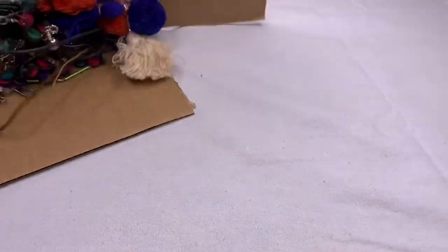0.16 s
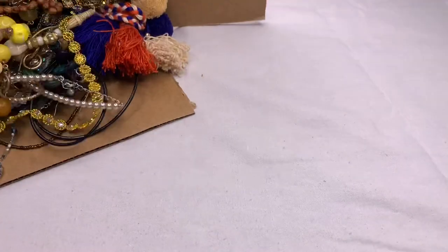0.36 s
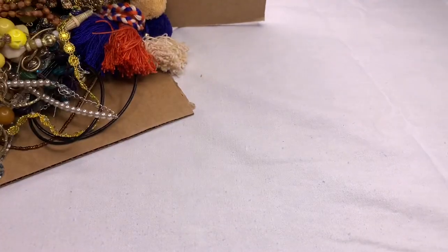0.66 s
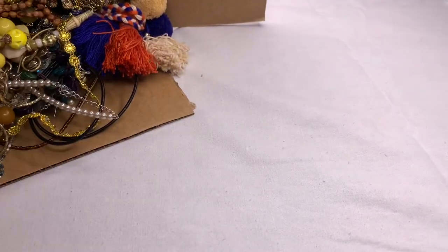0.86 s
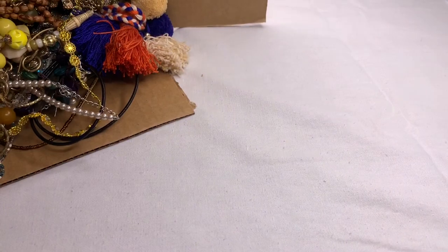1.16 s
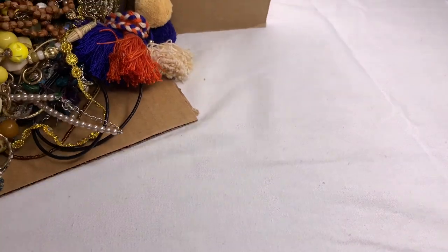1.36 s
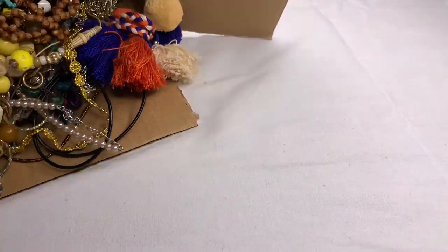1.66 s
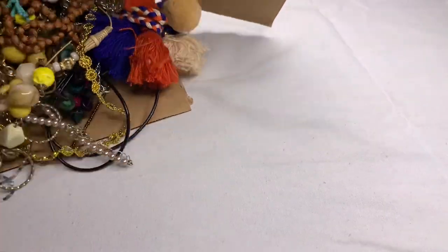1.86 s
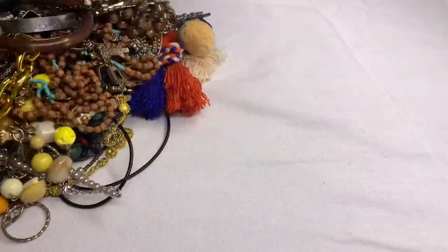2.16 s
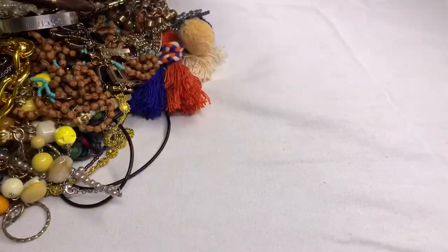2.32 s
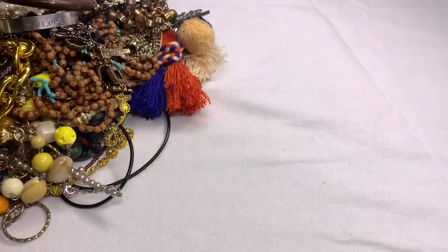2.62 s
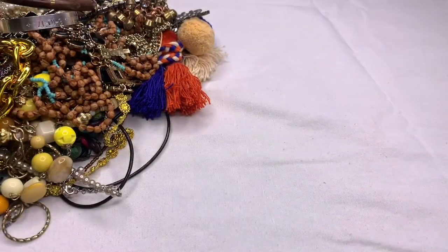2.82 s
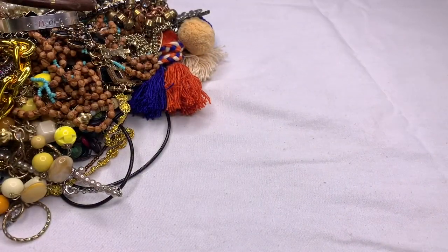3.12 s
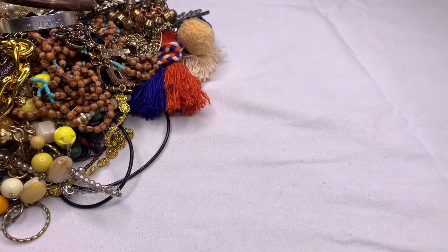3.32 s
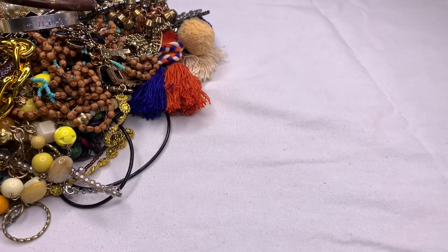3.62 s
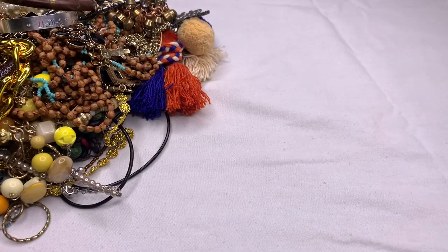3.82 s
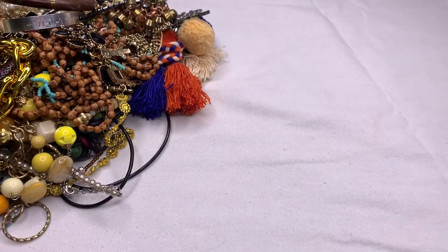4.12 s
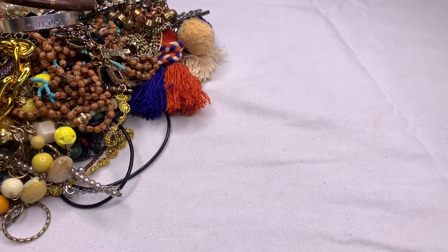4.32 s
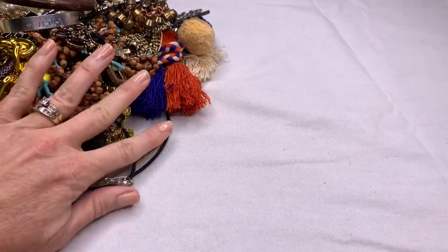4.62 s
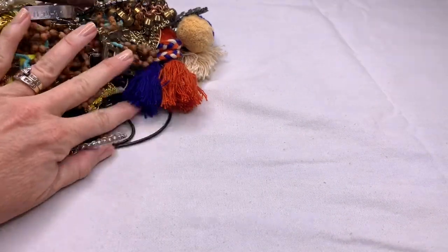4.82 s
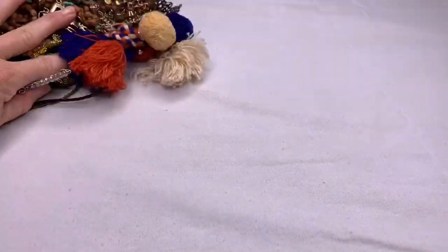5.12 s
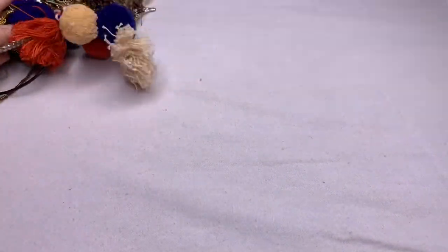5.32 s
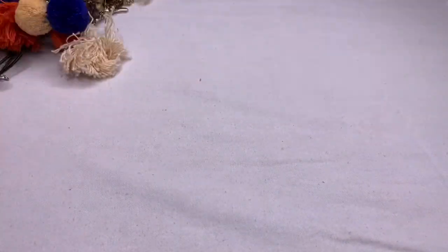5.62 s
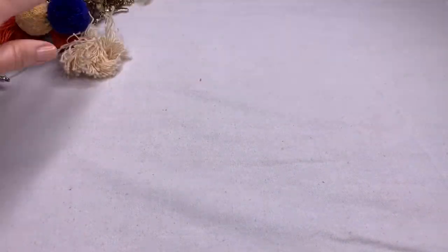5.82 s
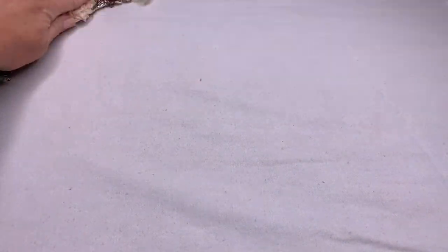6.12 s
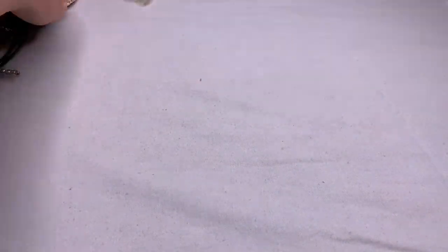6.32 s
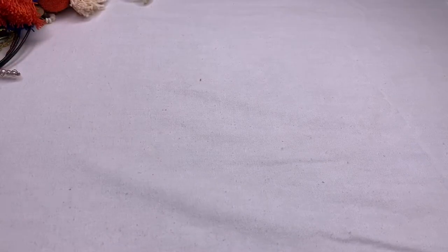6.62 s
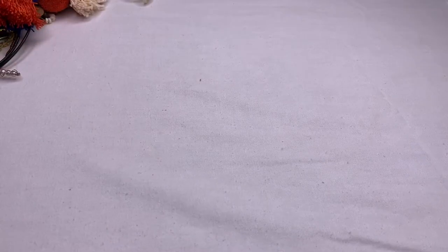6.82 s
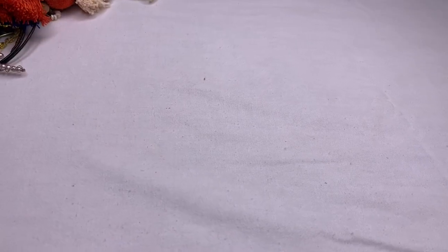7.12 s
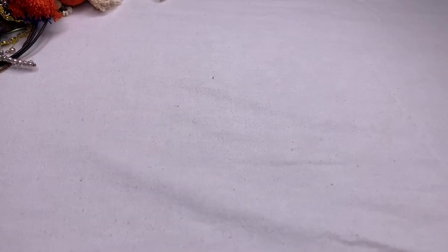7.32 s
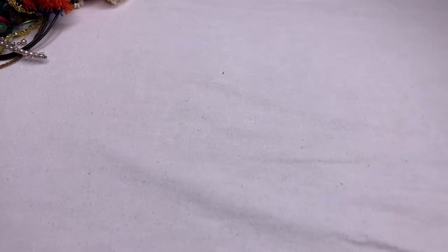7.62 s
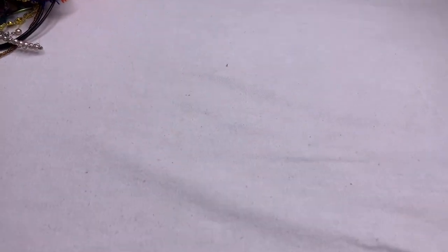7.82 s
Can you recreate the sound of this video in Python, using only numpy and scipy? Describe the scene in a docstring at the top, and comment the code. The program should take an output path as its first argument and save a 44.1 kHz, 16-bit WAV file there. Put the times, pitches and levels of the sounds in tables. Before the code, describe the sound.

A tangle of beads and chains slides rattling out of a cardboard box onto a cloth-covered table, the empty box thuds down, then soft sweeps and creaks.

```python
"""In a small dry room with a faint hum, a cardboard box of chains and beads is tipped out on a cloth-covered
table, left of a two-port microphone. Noise grains and damped sines make the beads rattle and thump the card;
the empty box is dropped as a set of ringing modes under a slap; a hand sweeps the pile over the cloth twice
as shaped noise; and something close by creaks in short runs of ticks that ring a low body."""
import sys
import numpy as np
from scipy import signal
from scipy.fft import rfft, irfft, next_fast_len
from scipy.io import wavfile
from scipy.ndimage import uniform_filter1d

SR = 44100
rng = np.random.default_rng(int(sys.argv[2]) if len(sys.argv) > 2 else 0)


def store_wav(level_fs):
    """Save 16-bit WAV to argv[1]."""
    pcm = np.round(np.clip(np.atleast_2d(level_fs), -1, 1) * 32767)
    wavfile.write(sys.argv[1], SR, pcm.T.astype(np.int16))


N = 351477

# resonances of the cardboard panel: f/Hz, width/Hz, level/dB
CARD_MODES = [(187, 210, 7), (508, 250, 8.5), (736, 109, 13.5), (1040, 130, 3), (1860, 240, -10)]
# resonances of the table top: f/Hz, width/Hz, level/dB
TABLE_MODES = [(105.3, 80, -12.5), (237, 43, 5), (467, 83, 0), (660, 100, -2.5), (747.5, 210, -9),
               (1092, 130, -14.5)]


def amp(db):
    """Amplitude ratio of a level in dB."""
    return 10 ** (np.asarray(db) / 20)


def unit(x):
    """x scaled to rms 1."""
    return x / np.sqrt(np.mean(x ** 2) + 1e-20)


def along(points, hz):
    """Read (f/Hz, value) points at any frequency, straight lines on a log axis."""
    f, value = np.transpose(points)
    return np.interp(np.log(hz + 1), np.log(f + 1), value)


def gains(rows):
    """Fade lines: one gain per sample for each dB column, silent outside the rows."""
    times, *columns = np.transpose(rows)
    t = np.arange(N) / SR
    return [amp(np.interp(t, times, column, -150, -150)) for column in columns]


def filtered(x, response):
    """Shape the spectrum of x by a complex response of frequency."""
    m = next_fast_len(N + SR // 2)
    return irfft(rfft(x, m) * response(np.fft.rfftfreq(m, 1 / SR)), m)[..., :N]


def coloured(x, spectrum):
    """Equalise x by (f/Hz, level/dB) points."""
    return filtered(x, lambda hz: amp(along(spectrum, hz)))


def through(x, modes):
    """x excites a body: parallel (f/Hz, width/Hz, level/dB) resonances of alternating sign."""
    def body(f):
        total = 0
        for k, (centre, width, db) in enumerate(modes):
            resonance = 1j * f * width / (centre * centre - f * f + 1j * f * width)
            total = total + (-1) ** k * amp(db) * resonance
        return total
    return filtered(x, body)


def contacts(per_s, spread_db, smooth, t60):
    """Random contacts of unequal size, each a dying puff of noise, over a share of smooth noise."""
    happens = rng.random(N) < per_s / SR
    sizes = happens * amp(spread_db * np.clip(rng.standard_normal(N), -2, 2))
    swell = signal.lfilter([1], [1, -amp(-60 / (t60 * SR))], sizes)
    share = np.clip(smooth, 0, 1)
    return (np.sqrt(1 - share) * unit(swell) + np.sqrt(share)) * rng.standard_normal(N)


def bursts(times, levels_db, t60, rise=0.0004):
    """A short dying puff of noise at each time, its level set by its energy."""
    out, t = np.zeros(N + SR), np.arange(SR // 10) / SR
    shape = amp(-60 * t / t60) * (1 - np.exp(-t / rise))
    for s, db in zip(times, levels_db):
        puff = shape * rng.standard_normal(len(t))
        out[round(s * SR):][:len(t)] += amp(db) * puff / np.linalg.norm(puff)
    return out[:N]


def rings(times, levels_db, pitches_hz, t60s, rise):
    """A damped sine at each time, with a softened attack."""
    out, t = np.zeros(N + SR), np.arange(SR // 8) / SR
    for s, db, hz, t60 in zip(times, levels_db, pitches_hz, t60s):
        shape = amp(db - 60 * t / max(t60, .004)) * (1 - np.exp(-t / rise))
        out[round(s * SR):][:len(t)] += shape * np.sin(2 * np.pi * hz * t)
    return out[:N]


def clacks(per_s, centre_hz, spread, turns, spread_db):
    """Hard beads meeting: each a few turns of a damped sine at its own pitch; rms 1."""
    count, t = 25 * 343, np.arange(400) / SR  # candidates, of which a share sounds
    when, pick = rng.random((count, 2)).T
    pitch, size = rng.standard_normal((count, 2)).T
    hz = np.clip(centre_hz * np.exp(spread * pitch), 600, 15000)[:, None]
    sounds = pick < per_s * N / SR / count
    size = sounds * amp(spread_db * np.clip(size, -2, 2))
    grain = size[:, None] * np.exp(-t * hz / turns) * np.sin(2 * np.pi * hz * t)
    at = (when * N).astype(int)[:, None] + np.arange(len(t))
    return unit(np.bincount(at.ravel(), grain.ravel(), N + len(t))[:N])


def patchy(x, depth_db):
    """Random gain patches, some hundred Hz by some tens of ms: different pieces lead in turn."""
    z = signal.stft(x, nperseg=256)[2]
    field = uniform_filter1d(rng.standard_normal(z.shape[1:]), size=5, axis=0)
    field = uniform_filter1d(field, size=10, axis=1)
    return signal.istft(z * amp(depth_db * unit(field)), nperseg=256)[1][:, :N]


def background():
    """Air noise, alike at both ports in the bass only, a gently wavering hum and fuzzy whines."""
    # spectrum of the air noise: f/Hz, level/dB
    quiet_spectrum = [(15, -57), (25, -28), (100, -6.5), (180, -14), (266, -2), (360, -13), (650, -16),
                      (900, -20), (1220, -13), (2270, -32), (2700, -29), (13600, -47.5), (16500, -60.5)]
    # the hum (its width is the pace of its wavering), then the whines: f/Hz, width/Hz, level/dB
    hum_lines = [(263.8, 1.5, -67.5), (1200, 80, -84), (1560, 80, -86)]
    quiet_db = -58 - 7.5

    common, left, right = rng.standard_normal((3, N))
    bass = lambda hz: 1 / (1 + (hz / 900) ** 2)
    rest = lambda hz: np.sqrt(1 - bass(hz) ** 2)
    air = filtered(common, bass) + filtered(np.array([left, right]), rest)

    (hum_hz, hum_width, hum_db), *whines = hum_lines
    drift = unit(filtered(rng.standard_normal(N), lambda hz: 1 / (1 + (hz / hum_width) ** 2)))
    phase = 2 * np.pi * hum_hz * np.arange(N) / SR + .6 * drift
    hum = np.sqrt(2) * amp(hum_db + 1.5 * drift) * np.sin(phase)
    whine = sum(amp(db) * unit(through(rng.standard_normal(N), [(hz, width, 0)]))
                for hz, width, db in whines)
    return amp(quiet_db) * unit(coloured(air, quiet_spectrum)) + hum + whine


def slides():
    """Gains of slack and taut rumble, rattle and its treble: each slide swells fast, holds, fades."""
    # the pile slips along the box in fits: start/s, length/s, cardboard rumble/dB, bead rattle/dB,
    # treble relative to the rattle/dB, panel tautness (0-1)
    slide_events = [(0.0, 0.11, -25, -37, 0.5, 0.56), (0.093, 0.052, -29, -33, 0, 0.2),
                    (0.148, 0.022, -27, -29, 3, 0.2), (0.182, 0.082, -26.5, -30.5, 4.5, .1),
                    (0.272, 0.11, -37, -39, 1, 0.01), (0.402, 0.051, -28.5, -50, 6.5, 0),
                    (0.518, 0.14, -44.5, -61.5, 8.5, 0), (0.66, 0.092, -53, -63.5, -3.5, 0.1),
                    (0.753, 0.11, -46.5, -61, -2, 0), (0.819, 0.08, -44, -56, 1.5, 0),
                    (0.933, 0.048, -40, -50, -5.5, 0.4), (0.984, 0.0068, -38.5, -42.5, 3.5, 0.4),
                    (1.058, 0.028, -50.5, -56.5, -3, 0.5), (1.151, 0.05, -46.5, -61, 5, 0.2),
                    (1.222, 0.05, -27, -44, -2, 0), (1.293, 0.19, -41, -52, 2.5, .3),
                    (1.56, 0.074, -37.5, -50.5, 0, 0.1), (1.656, 0.06, -30, -41.5, -1, 0.4),
                    (1.724, 0.097, -31, -38, -5, 0), (1.756, 0.12, -31.5, -31.5, -4, 0.8),
                    (1.807, 0.045, -23.5, -23.5, -3, 0.1), (1.871, 0.057, -24, -24, -4.5, 0.3),
                    (1.94, 0.13, -29.5, -33, -6, 0.2), (2.005, 0.034, -28.5, -31.5, -4, 0.6),
                    (2.023, 0.023, -22.5, -25.5, -0.5, .6), (2.035, 0.026, -15.5, -18, -0.5, 0.7),
                    (2.092, .02, -31, -39.5, -3, 0.4), (2.134, 0.0072, -23, -29, 0, 0.3),
                    (2.176, 0.006, -27, -35.5, -5.5, 0.4), (2.194, 0.012, -27.5, -43, -4, 0.6),
                    (2.224, 0.024, -23, -38.5, -2.5, 0.6), (2.293, 0.18, -29.5, -46.5, -1.5, 1),
                    (2.558, 0.0049, -38, -52.5, -13, 0.2), (2.606, 0.051, -43, -47, -3, 0.4),
                    (2.697, 0.21, -57.5, -58.5, 6, 0.2), (2.892, 0.016, -41, -54, 4, 0.9),
                    (2.928, 0.15, -55, -60.5, 5, 0.6), (3.027, 0.034, -43, -54.5, 7, 0.6),
                    (3.141, 0.021, -35, -51.5, 1, .5), (3.224, 0.049, -55.5, -62.5, 1.5, 0.3),
                    (3.29, 0.12, -45, -60, 4, 0.8), (3.396, 0.027, -50, -52, -1.5, 0.7),
                    (3.494, 0.28, -60, -62.5, -4, 0.9), (3.803, 0.074, -54.5, -61, -1, 0.65)]
    attack_s, fade_db_per_s = 0.0072, 431

    power, t = np.zeros((4, N + SR)), np.arange(SR) / SR
    for start, length, rumble_db, rattle_db, treble_db, taut in slide_events:
        shape = np.clip(t / attack_s, 0, 1) * amp(-fade_db_per_s * np.clip(t - length, 0, 1))
        taut = np.clip(taut, 0, 1)
        levels = amp([rumble_db, rumble_db, rattle_db, rattle_db + treble_db])
        shares = np.array([1 - taut, taut, 1, 1]) * levels ** 2
        power[:, round(start * SR):][:, :SR] += shares[:, None] * shape ** 2
    return np.sqrt(power[:, :N])


def pour():
    """Sliding beads drum the slack or taut card, clack and chink; the pile's two ends rustle apart."""
    # spectrum of the bead rattle: f/Hz, level/dB
    rattle_spectrum = [(760, -24.5), (1300, -5.5), (2000, -3.5), (3500, -4.5), (4300, -2), (7000, -10),
                       (10000, -10), (14000, -12.5), (15500, -6.5), (15900, -40)]
    taut_rise = 1.13  # pitch ratio of the taut panel to the slack one
    treble_hz = 3680  # where the rattle's treble begins
    clack_db = -1.5 - 6.0

    slack, taut, rattle, treble = slides()
    strokes = contacts(220, spread_db=-2.0, smooth=0.035, t60=0.072)
    taut_modes = np.multiply(CARD_MODES, [taut_rise, 1, 1])
    drum = slack * unit(through(strokes, CARD_MODES)) + taut * unit(through(strokes, taut_modes))

    knock = clacks(300, centre_hz=2090, spread=0.27, turns=4.9, spread_db=3.5)
    hard = clacks(600, centre_hz=5470, spread=0.36, turns=2.1, spread_db=0.0)
    chink = clacks(90, centre_hz=5200, spread=0.39, turns=11, spread_db=3)

    ends = np.array([contacts(380, spread_db=4, smooth=.25, t60=.012) for _ in range(2)])
    ends = unit(coloured(patchy(ends, depth_db=2.5), rattle_spectrum))
    high = filtered(ends, lambda hz: 1 / (1 + (treble_hz / (hz + 1)) ** 6))

    body = amp(-5.0) * drum + amp(clack_db) * rattle * knock
    body = body + treble * (amp(-12.5) * hard + amp(-16.0) * chink)
    return body, amp(-2.0) * (rattle * (ends - high) + treble * high)


def thumps():
    """Heavier pieces ring the panel with an overtone, a puff and a click, over low card and table."""
    # thumps on cardboard and table: t/s, level/dB, depth relative to the level/dB, f/Hz
    thump_events = [(0.0185, -6.5, -41.5, 680), (0.03, -12, -14.5, 745), (0.046, -18, -23, 690),
                    (0.101, -14, -20, 654), (0.13, -18, -36, 650), (0.165, -6, -31.5, 715),
                    (0.192, -11.5, -31.5, 668), (0.229, -11.5, -28, 535), (0.251, -9.5, -30, 693),
                    (0.3211, -13, -37, 620), (0.419, -18, -41, 687), (0.449, -19.5, -25, 350),
                    (0.578, -46, 0, 704), (0.612, -31, -35, 690), (0.65, -34, -13, 630),
                    (0.685, -32, -24, 620), (0.747, -34, 0.5, 416), (0.83, -31, -8, 710),
                    (0.86, -34, -5, 720), (0.948, -26, 8, 666), (0.993, -17.5, -20.5, 756),
                    (1.171, -31.5, -1, 520), (1.2165, -14.5, -10.5, 430), (1.251, -22, -14, 543),
                    (1.279, -27, -3, 720), (1.388, -27, -27, 366), (1.432, -29.5, -9, 587),
                    (1.506, -22.5, -10, 427), (1.616, -23, -26, 847), (1.667, -19, -0.5, 800),
                    (1.69, -27, -9.5, 414), (1.82, -18.5, -29, 936), (1.859, -14.5, -19.5, 650),
                    (1.901, -14.5, -21, 976), (1.933, -13.5, -26, 436), (2.015, -14, -22.5, 643),
                    (2.055, -1.5, -27.5, 556), (2.073, -8, -16.5, 580), (2.102, -17.5, -35.5, 475),
                    (2.1451, -12.5, -34, 782), (2.182, -18.5, -35, 620), (2.202, -9, -10.5, 720),
                    (2.23, -13.5, -10, 1016), (2.246, -16, -22, 773), (2.294, -22.5, -22, 834),
                    (2.366, -28, -20, 820), (2.393, -27.5, -3, 477), (2.471, -21, -12, 798),
                    (2.564, -35, 3.5, 455), (2.61, -41.5, 13, 557), (2.651, -35, 7, 396),
                    (2.891, -32.5, -4, 766), (3.043, -39.5, 5, 393), (3.064, -29, -1, 780),
                    (3.084, -19.5, -2, 404), (3.151, -27, -1, 1035), (3.186, -24.5, -14, 643),
                    (3.301, -36.5, -6, 725), (3.385, -37, -22, 820), (3.418, -35, -27, 1108),
                    (3.439, -31, -1, 400), (4.736, -34, -12, 635), (5.128, -35, -20, 480),
                    (5.3228, -28.5, -25, 640), (5.338, -26.5, -25, 608), (5.36, -34, -24, 484),
                    (5.385, -33.5, -26, 490), (5.967, -43, -33, 450), (6.775, -50, -4.5, 364),
                    (6.81, -55.5, -9.5, 477), (7.197, -53, 2.5, 300)]
    ring_t60, puff_t60, click_db = 0.034, .03, 4  # s, s, dB

    s, db, depth_db, hz = np.transpose(thump_events)
    each = np.ones(len(s))
    panel = rings(s, db, hz, ring_t60 * each, rise=0.0013)
    panel += through(bursts(s, db + 18.0, t60=puff_t60), CARD_MODES[1:])
    panel += rings(s, db - 8.5, np.minimum(1.4 * hz, 1250), .018 * each, rise=0.00056)
    depth = rings(s, db + depth_db + 3, CARD_MODES[0][0] * each, .06 * each, rise=.003)
    depth += rings(s, db + depth_db - 6.0, TABLE_MODES[0][0] * each, .09 * each, rise=0.0054)
    click = through(bursts(s, db + click_db, t60=0.018), [(2234, 1100, 0.19), (4470, 830, -2)])
    return panel + depth + click


def clicks():
    """A bead or link cracks in a band around its pitch, with brief ring and bright edge; metal rings on."""
    # single bead and link clicks: t/s, level/dB, f/Hz, bright edge relative to the level/dB
    click_events = [(0.036, -19, 2050, -2), (0.0987, -17.5, 6470, -6), (0.154, -21.5, 4600, -12),
                    (0.1714, -13, 5040, -14), (0.2067, -6, 6670, -21), (0.249, -31, 2180, 5),
                    (0.379, -17.5, 2270, -25.5), (0.539, -21, 4770, -35), (0.584, -25, 5930, -20),
                    (0.602, -30.5, 7000, 3), (0.706, -39, 2180, -22), (0.826, -36.5, 2040, 4.5),
                    (0.945, -37, 2090, 3), (0.9914, -17, 2040, -19), (1.0103, -22.5, 4100, -2),
                    (1.1144, -67, 3950, -23), (1.1567, -49, 1950, -4), (1.2157, -22, 3900, -37),
                    (1.577, -34, 5460, -8), (1.596, -32, 2570, -15), (1.606, -25, 2380, -15),
                    (1.612, -47, 3100, -15), (1.625, -37.5, 2460, 7), (1.666, -25.5, 1690, -4.5),
                    (1.815, -35, 1890, -25), (1.8582, -24, 2060, -24.5), (1.898, -14.5, 2270, -18),
                    (2.0305, -15, 1650, -30), (2.045, -3, 3560, -24), (2.102, -15, 2500, -4),
                    (2.1472, -14, 3164, -20), (2.184, -11.5, 2530, -30), (2.1985, -33.5, 2150, 14),
                    (2.293, -51, 1780, -17), (2.24, -22, 3026, -10), (2.255, -27, 3000, -1),
                    (2.334, -27, 3670, -4), (2.393, -30, 3270, 3.5), (2.476, -32, 2400, 2),
                    (2.5648, -31.5, 2560, -10.5), (2.61, -25.5, 2660, -16), (2.717, -36.5, 3100, -23),
                    (3.04, -25.5, 3720, -3.5), (2.905, -42.5, 2470, -8), (3.153, -34, 2000, -4.5),
                    (3.179, -39, 2780, 5.5), (3.299, -36.5, 2620, -1), (3.402, -38, 2290, -22),
                    (3.417, -31, 3540, -17), (4.6024, -43, 13750, -0.5), (4.686, -46, 12600, -18),
                    (4.703, -43.5, 11940, -11.5), (4.735, -39.5, 2700, -10), (4.881, -41.5, 3200, 8),
                    (4.9423, -39, 12640, -10), (4.9935, -40, 13900, -13), (5.151, -37, 14100, -4),
                    (5.322, -34, 2670, -4), (5.337, -42.5, 14000, 17.5), (5.355, -47, 12700, 18),
                    (5.5063, -43, 14000, 8), (5.5565, -36, 8940, -14.5), (6.044, -36, 8300, -15),
                    (6.044, -46, 3800, -20), (6.138, -31, 8160, -20), (6.39, -58.5, 9010, -10),
                    (6.775, -42.5, 1053, -6), (6.809, -47, 2900, -25), (6.887, -52, 2800, -12.5)]
    # small metal pieces that ring on: t/s, level/dB, f/Hz, t60/s
    clink_events = [(0.38, -30, 2550, 0.045), (0.76, -53, 2177, .15), (1.617, -29.5, 2430, 0.058),
                    (1.815, -21, 5250, 0.047), (2.146, -34, 5100, 0.027), (2.168, -24, 8490, 0.022),
                    (2.235, -32, 1330, 0.033), (2.666, -40, 3030, 0.042), (2.719, -31.5, 3160, 0.033),
                    (2.72, -41, 1882, 0.046), (4.735, -43, 1280, 0.044), (4.881, -38, 3260, 0.02),
                    (4.883, -42, 2730, 0.035), (5.329, -34.5, 3077, 0.03), (5.558, -48.5, 2886, 0.022),
                    (6.14, -40, 3020, 0.016), (6.777, -54.5, 9300, .025), (6.887, -60, 9400, .015),
                    (6.262, -47, 8330, .03)]

    s, db, hz, bright_db = np.transpose(click_events)
    cracks, t = np.zeros(N + SR), np.arange(SR // 25) / SR
    for at, level_db, centre_hz in zip(s, db, hz):
        limits = [centre_hz / 1.9, min(centre_hz * 1.9, 15600)]
        band = signal.butter(2, limits, "band", fs=SR)
        noise = unit(signal.lfilter(*band, rng.standard_normal(len(t))))
        cracks[round(at * SR):][:len(t)] += noise * amp(level_db - 9 - 60 * t / 0.015)
    edge_spectrum = [(2500, -25.0), (6000, 2.5), (15500, 6.0), (15900, -29.5)]  # f/Hz, level/dB
    edge = coloured(bursts(s, db + bright_db + 8.5, t60=0.02), edge_spectrum)
    metal = rings(*np.transpose(clink_events), rise=.0006)
    brief = rings(s, db - 2, hz, 0.0047 + 20 / hz, rise=0.000075)
    return cracks[:N] + edge + metal + brief


def drop():
    """The empty box lands in a few close blows: its modes ring over a dull slap."""
    # the box lands corner, edge, edge, face, flap: t/s, level/dB
    blows = [(3.941, -38), (3.9466, -11), (3.9525, -10), (3.958, -7), (3.971, -23.5)]
    # modes of the empty box: f/Hz, level/dB, t60/s
    box_modes = [(132, -17.5, .1), (170, -14.5, 0.067), (249.4, -30, 0.14), (329.6, -28, 0.11),
                 (400.2, -19.5, .16), (460, -8.5, 0.14), (515, -15.5, 0.086), (626, -12.5, 0.14),
                 (733, -26.5, 0.044), (810, -19, 0.11), (949.4, -18.5, 0.054), (1060, -20.5, 0.056),
                 (1226, -16, 0.056), (1654, -24.5, 0.067), (1991, -27.5, 0.042), (2340, -35.5, 0.054)]
    # spectrum of the slap: f/Hz, level/dB
    slap_spectrum = [(24, -56.5), (40, -28.5), (100, -17.5), (170, -6.5), (244, -11), (360, -8.5),
                     (627, -3), (1200, -9), (1610, -13.5), (2300, -17), (3200, -27), (5000, -34),
                     (15000, -46)]
    scatter_db = 1.5  # each blow wakes the modes a little differently
    longest_t60 = .16  # cardboard rings no longer than this, s

    hz, level_db, t60 = np.transpose(box_modes)
    out, t = np.zeros(N + SR), np.arange(SR // 2)[:, None] / SR
    for s, db in blows:
        mode_db = level_db + scatter_db * rng.standard_normal(len(hz))
        decay = amp(mode_db - 60 * t / np.minimum(t60, longest_t60))
        modes = decay * np.sin(2 * np.pi * hz * t) * (1 - np.exp(-t / 0.0033))
        out[round(s * SR):][:len(t)] += amp(db + 1.0) * np.sum(modes, axis=1)
    s, db = np.transpose(blows)
    return out[:N] + coloured(bursts(s, db + 40.5, t60=0.03, rise=0.0013), slap_spectrum)


def sweeps():
    """The pile dragged over cloth hums in the table top in lumps, rustles, and its beads clack."""
    # one list for each sweep of the hand: t/s, table rumble/dB, bead rustle/dB
    sweep_fades = [
        [(4.58, -79.5, -91), (4.61, -80, -78.5), (4.72, -64, -68), (4.89, -55.5, -66), (5.12, -53, -65),
         (5.39, -49, -65), (5.44, -53, -69.5), (5.555, -63.5, -68.5), (5.66, -86, -120)],
        [(5.91, -77.5, -90), (5.966, -61.5, -68.5), (6.14, -57.5, -66.5), (6.27, -59.5, -65.5),
         (6.34, -69.5, -81), (6.47, -73, -93), (6.56, -88, -100)],
    ]
    # spectrum of the beads on cloth: f/Hz, level/dB
    rustle_spectrum = [(760, -31.5), (1300, -3.5), (2200, -3.5), (3100, -3.5), (4000, -2), (7700, -1.5),
                       (11000, -5), (14300, 0.5), (15500, -1), (15900, -38)]

    lumps = contacts(250, spread_db=1, smooth=0.65, t60=0.04)
    wood = unit(through(patchy(lumps[None], depth_db=0.7)[0], TABLE_MODES))
    rubs = contacts(440, spread_db=2, smooth=0.48, t60=0.014)
    beads = unit(coloured(patchy(rubs[None], depth_db=2.6)[0], rustle_spectrum))
    beads = beads + amp(-12.5) * clacks(250, centre_hz=2000, spread=.35, turns=6, spread_db=6.5)
    return sum(amp(5.0) * low * wood + amp(5.5) * high * beads for low, high in map(gains, sweep_fades))


def slips():
    """Each slip snaps in changing colour and knocks the joint; the frame's low ring comes just after."""
    # creak ticks: t/s, level/dB, body/dB
    tick_events = [(7.4262, -38, -50.5), (7.4613, -29, -30), (7.4675, -36, -34), (7.5155, -33.5, -33.5),
                   (7.5205, -33.5, -33), (7.5356, -43, -33.5), (7.542, -51, -34), (7.5495, -45, -36),
                   (7.5563, -46.5, -38), (7.5653, -27.5, -26), (7.5858, -36, -31), (7.651, -28.5, -27.5),
                   (7.6564, -39.5, -30.5), (7.661, -44, -44), (7.6663, -35.5, -42), (7.6804, -36.5, -33.5),
                   (7.689, -42, -34.5), (7.6998, -40, -31), (7.7119, -36, -35), (7.7225, -35, -30.5),
                   (7.8073, -30, -24), (7.818, -44.5, -30), (7.9004, -34, -31.5), (7.9074, -44, -35.5),
                   (7.921, -49, -42.5), (7.938, -37.5, -31.5)]
    # spectrum of the snap: f/Hz, level/dB
    snap_spectrum = [(900, -2), (1500, -6), (2250, -8), (2700, 1.5), (3480, -12), (3950, 2.5), (4500, 1),
                     (5400, -1.5), (5800, -3), (6350, 7), (7000, 0.5), (8000, 6.5), (10000, -6), (14200, 9),
                     (15500, 15), (16600, -16.5)]
    # resonances of the joint: f/Hz, width/Hz, level/dB
    joint_modes = [(595, 70, 1.5), (1160, 170, 0)]
    # resonances of the frame: f/Hz, width/Hz, level/dB
    frame_modes = [(98.2, 46.3, -10.5), (149.6, 38.6, -2), (213.5, 27, 2), (308, 52, -2.5), (419, 66, -4.5)]
    tick_bright_db, brighter_per_db = -10.5, 1  # treble of a -30 dB tick; harder ticks are brighter

    s, db, body_db = np.transpose(tick_events)
    bright_db = tick_bright_db + brighter_per_db * (db + 30)
    s = s + 0.0022
    edge = lambda hz: 1 / (1 + (6500 / (hz + 1)) ** 6)
    dull = filtered(bursts(s, db + 18.5, t60=0.01, rise=.0001), lambda hz: 1 - edge(hz))
    bright = filtered(bursts(s, db + bright_db + 19.5, t60=0.005, rise=.0001), edge)
    snap = patchy(coloured(dull + bright, snap_spectrum)[None], depth_db=2)[0]
    joint = through(bursts(s + 0.00064, body_db + 23.5, t60=0.017), joint_modes)
    # single-sample pushes of random sign set the frame ringing
    push_sizes = amp(body_db + 37) * rng.choice([-1, 1], len(s))
    pushes = np.bincount(((s + 0.0022) * SR).astype(int), push_sizes, N)
    return snap + joint + through(pushes, frame_modes)


def creak():
    """The slips are heard through the air at both ports and through the stand at each port apart."""
    apart = np.clip(0.49, 0, 1)  # amplitude share that reaches each port by its own path
    return np.sqrt(1 - apart ** 2) * slips() + apart * np.array([slips(), slips()])


def placed(x, lag_ms, pan_db, shade=0):
    """The left port hears it lag_ms later and pan_db louder than the right, shaded by the housing."""
    # extra left-right level from the housing at full shade: f/Hz, level/dB
    housing = [(100, 11.5), (300, 10.5), (700, 10), (1300, 10.5), (2400, 11.5), (4400, 5.5), (8000, 0.5),
               (14000, -1)]
    side = np.array([[.5], [-.5]])
    tilt = lambda hz: amp(side * (pan_db + shade * along(housing, hz)))
    return filtered(x, lambda hz: tilt(hz) * np.exp(-2j * np.pi * hz * side * lag_ms / 1000))


def room(x, block=SR // 4):
    """A dying noise tail for each port, drawn anew every quarter second; its bass is shared."""
    # decay of the room: f/Hz, t60/s
    room_decay = [(100, .3), (500, 0.19), (3000, 0.18), (12000, 0.23)]
    out = np.zeros((2, N + SR))
    for start in range(0, N, block):
        hz, t, z = signal.stft(rng.standard_normal((2, SR // 3)), SR, nperseg=256)
        shared = np.clip(1 - hz / 1500, 0, 1)[:, None]
        z[1] = shared * z[0] + np.sqrt(1 - shared ** 2) * z[1]
        decay = amp(-60 * t / along(room_decay, hz)[:, None])
        tail = signal.istft(z * decay, SR, nperseg=256)[1]
        tail = tail / np.linalg.norm(tail[0])
        wet = signal.fftconvolve(x[None, start:start + block], tail, axes=1)
        out[:, start + 130:][:, :wet.shape[1]] += wet  # the tail starts 130 samples late
    return out[:, :N]


def scene():
    """Place every source between the ports, send each to the room and add the background."""
    body, (far_end, near_end) = pour()
    box, fall, beads, pile, near = body + thumps(), drop(), clicks(), sweeps(), creak()

    direct = placed(box + far_end, -0.15, pan_db=-5.0, shade=0.71)
    direct += placed(near_end, -0.081, pan_db=2.0, shade=0.94)
    direct += placed(fall, -.22, pan_db=0, shade=.5)
    direct += placed(beads, -.15, pan_db=1.5, shade=.5)
    direct += placed(pile, -0.1, pan_db=0.5)
    direct += placed(near, 0.094, pan_db=-0.24, shade=-.1)

    sent = amp(-6) * (box + far_end + near_end) + amp(0.0) * fall + amp(-9) * beads
    sent += amp(-0.5) * pile + amp(-21) * near[0]
    return direct + room(sent) + background()


def record(dry):
    """The microphone loses deep bass and rounds off the loudest peaks; the top of the band is cut."""
    full_scale, top_hz = .97, 16700
    thin = filtered(dry, lambda hz: (1j * hz / (60 + 1j * hz)) ** 3)
    rounded = thin / (1 + np.abs(thin / full_scale) ** 4) ** (1 / 4)
    return filtered(rounded, lambda hz: hz < top_hz)


dry = scene()
out = record(dry)
store_wav(out)
```